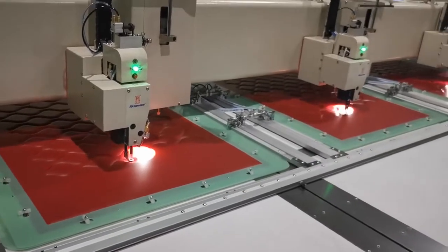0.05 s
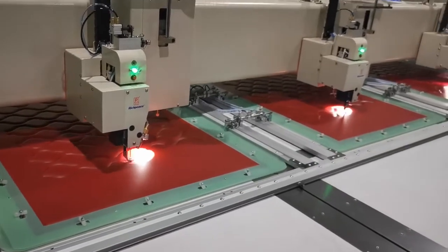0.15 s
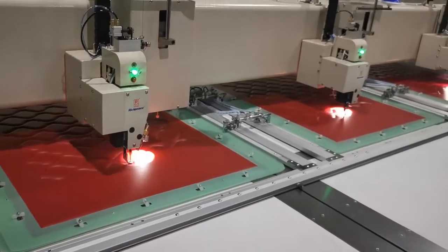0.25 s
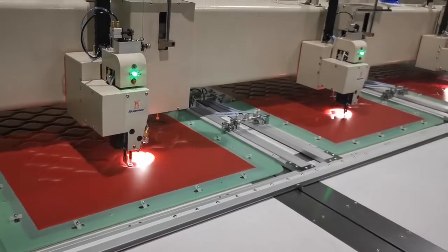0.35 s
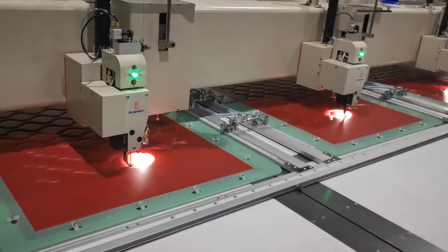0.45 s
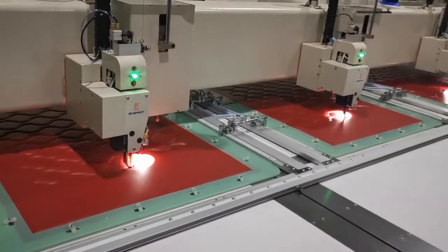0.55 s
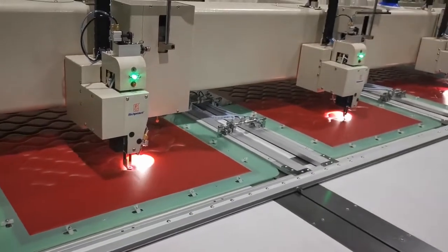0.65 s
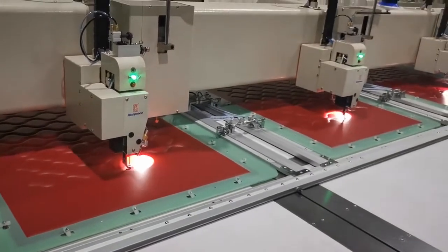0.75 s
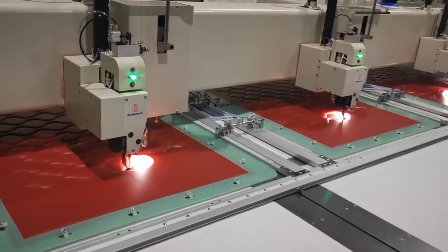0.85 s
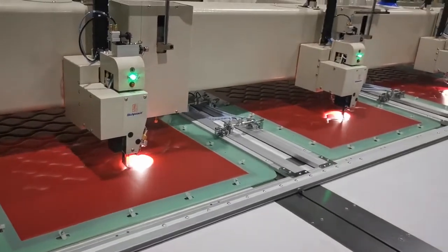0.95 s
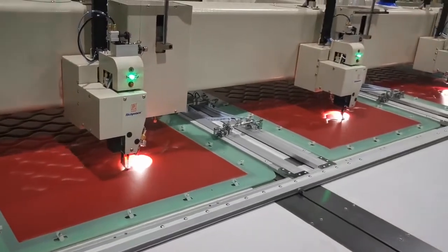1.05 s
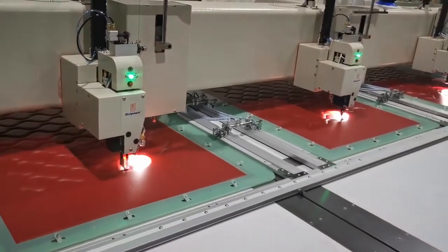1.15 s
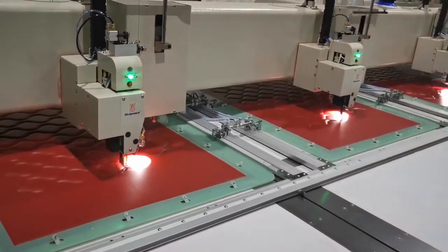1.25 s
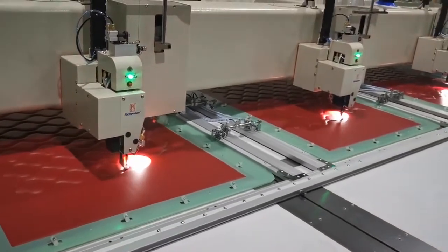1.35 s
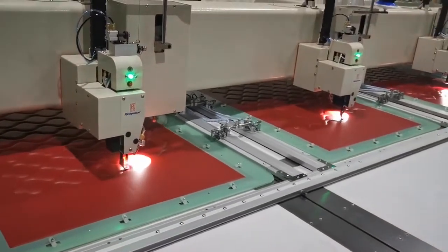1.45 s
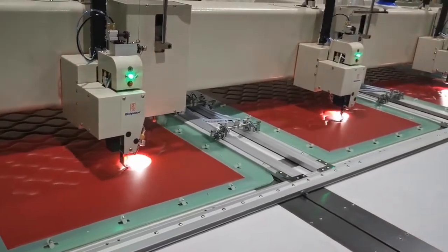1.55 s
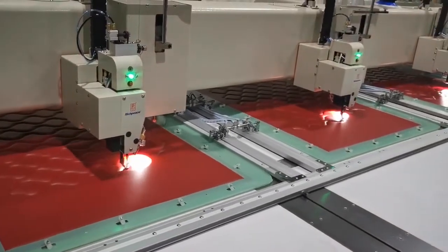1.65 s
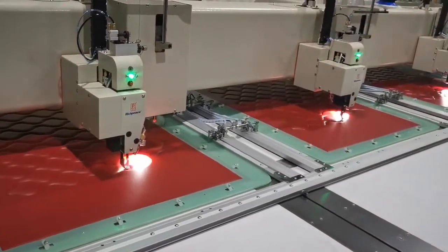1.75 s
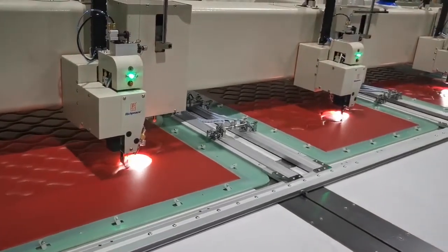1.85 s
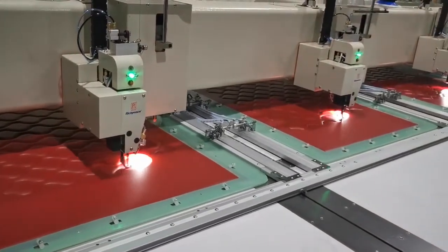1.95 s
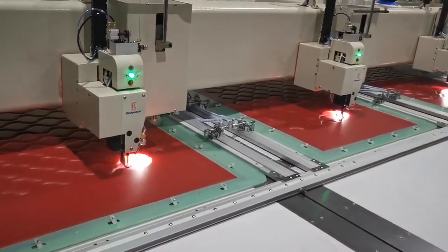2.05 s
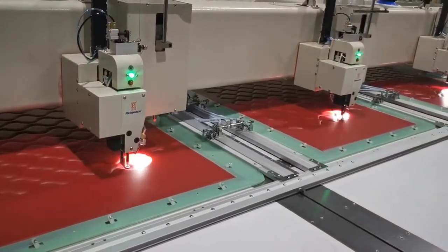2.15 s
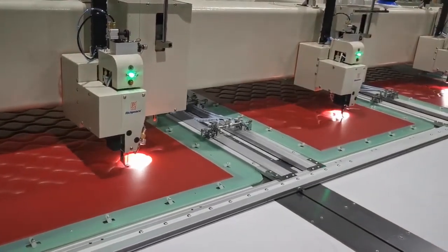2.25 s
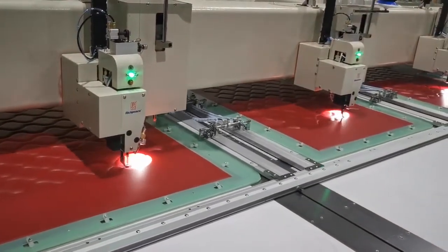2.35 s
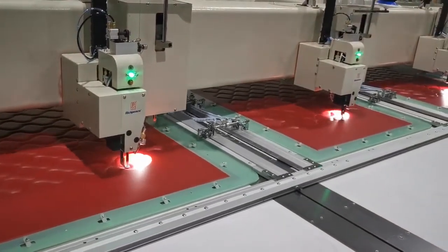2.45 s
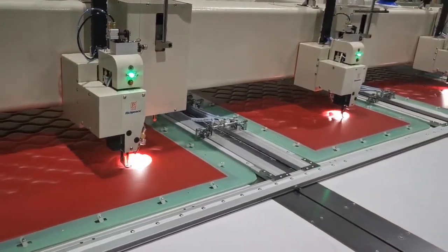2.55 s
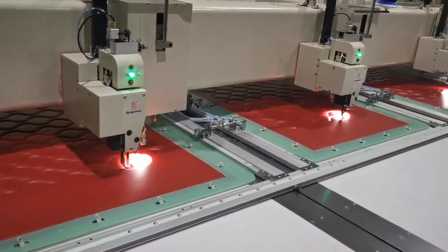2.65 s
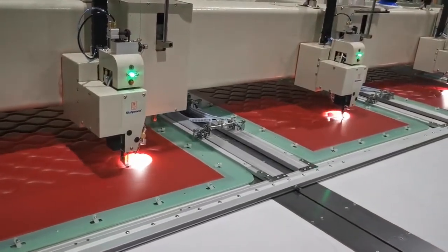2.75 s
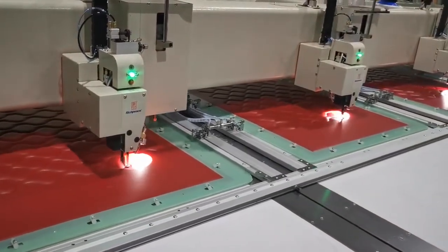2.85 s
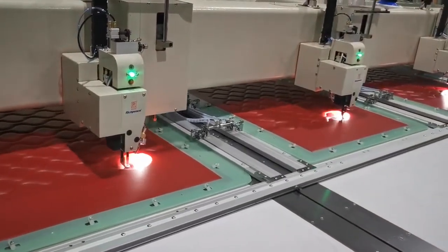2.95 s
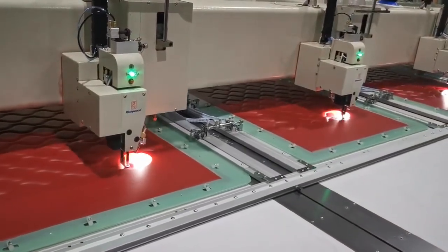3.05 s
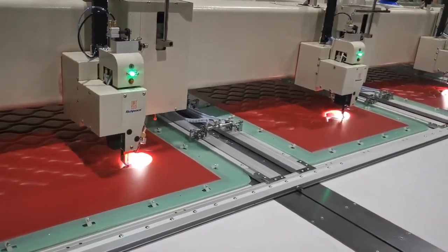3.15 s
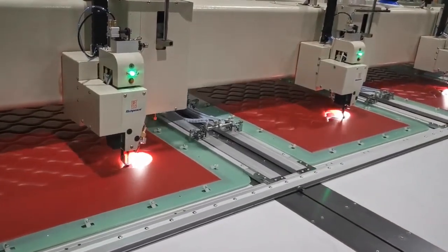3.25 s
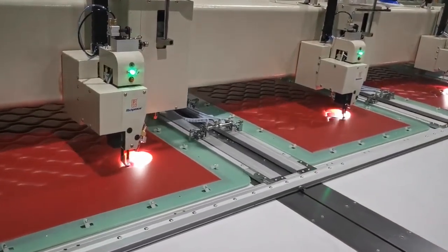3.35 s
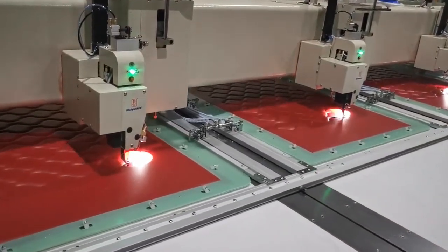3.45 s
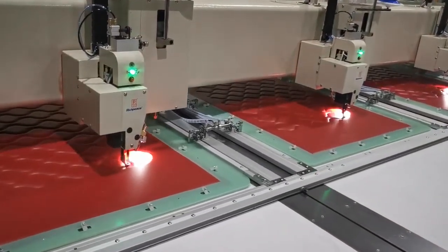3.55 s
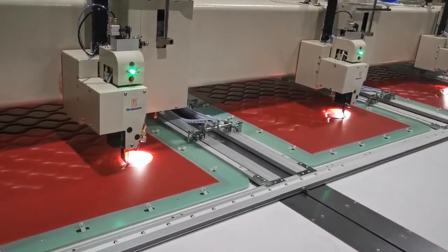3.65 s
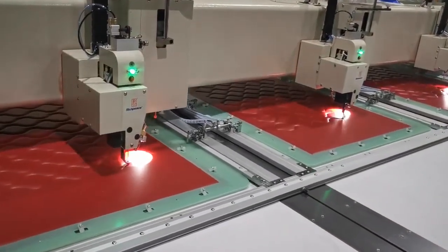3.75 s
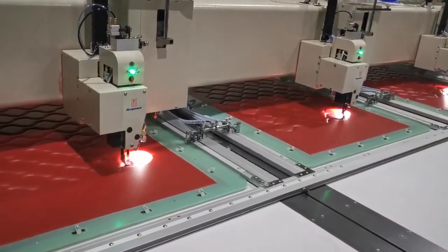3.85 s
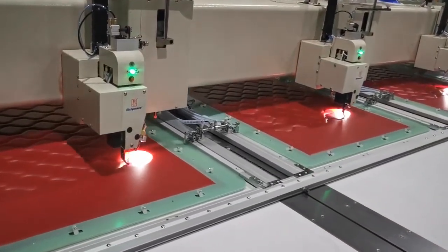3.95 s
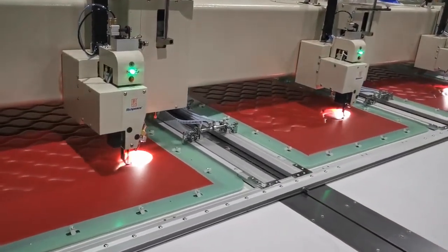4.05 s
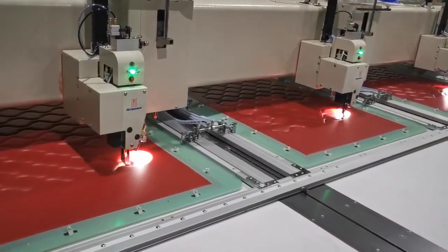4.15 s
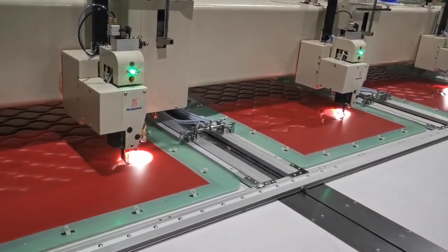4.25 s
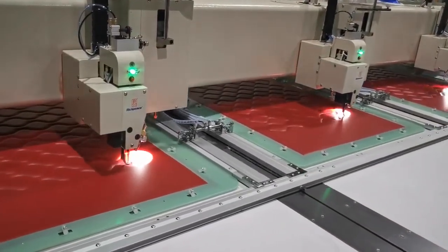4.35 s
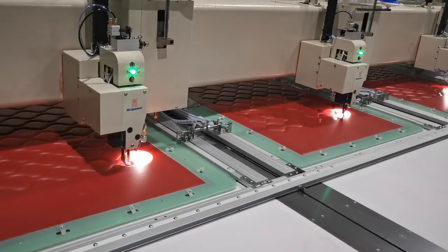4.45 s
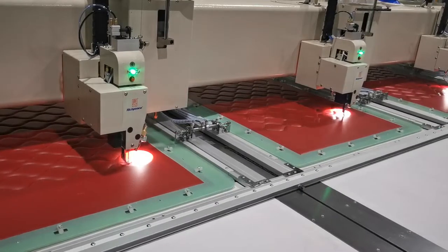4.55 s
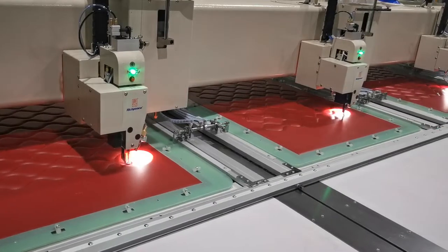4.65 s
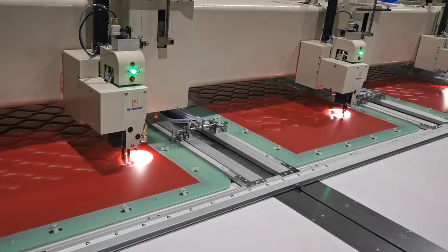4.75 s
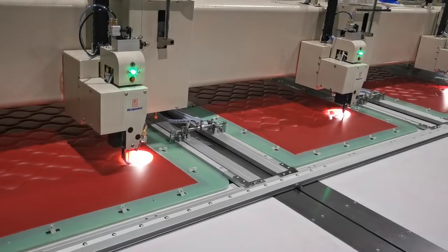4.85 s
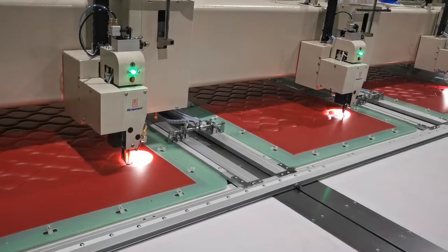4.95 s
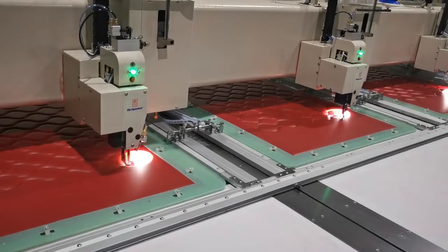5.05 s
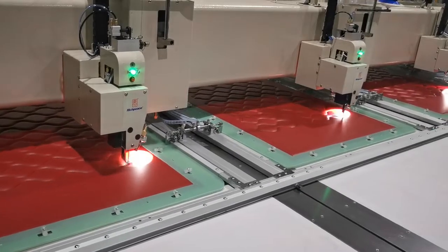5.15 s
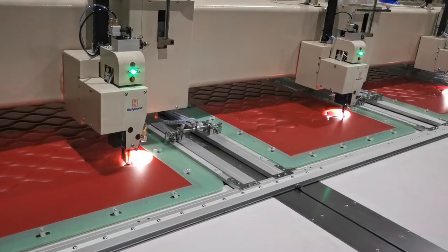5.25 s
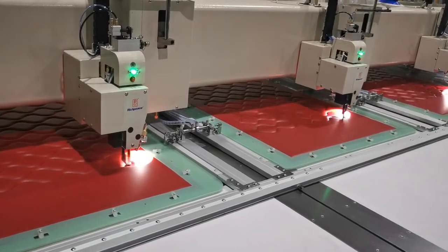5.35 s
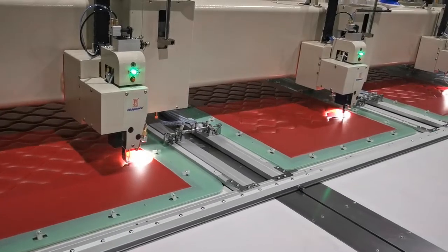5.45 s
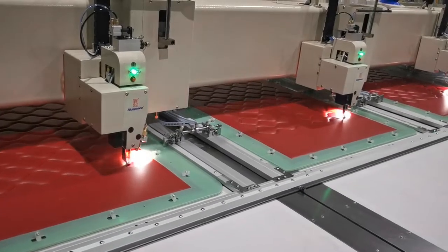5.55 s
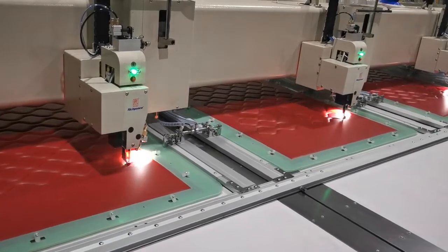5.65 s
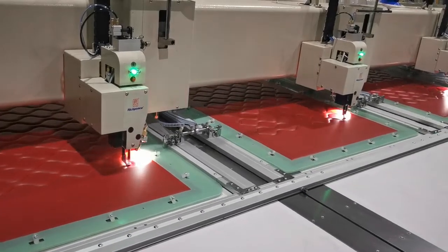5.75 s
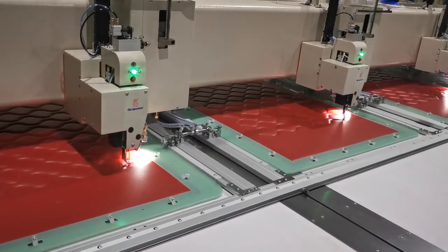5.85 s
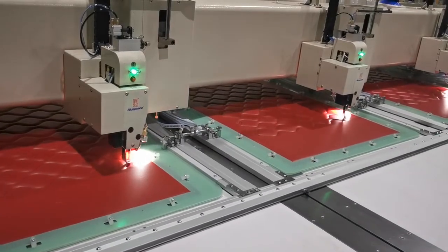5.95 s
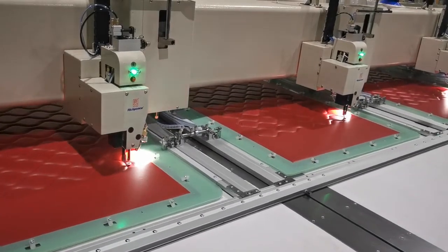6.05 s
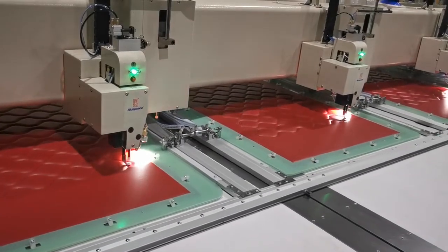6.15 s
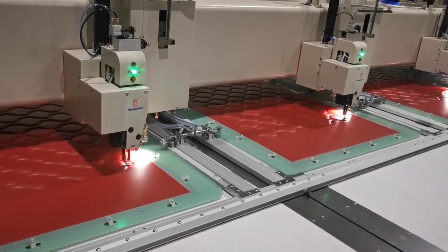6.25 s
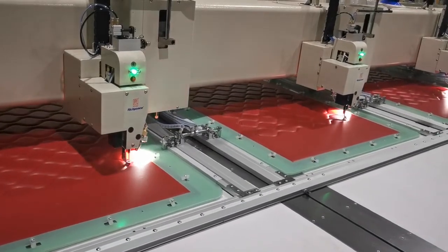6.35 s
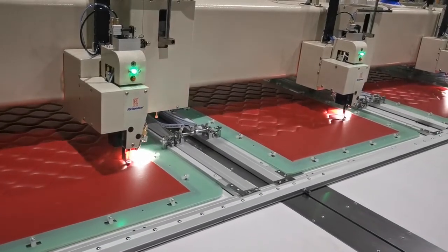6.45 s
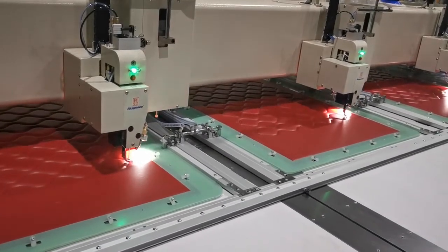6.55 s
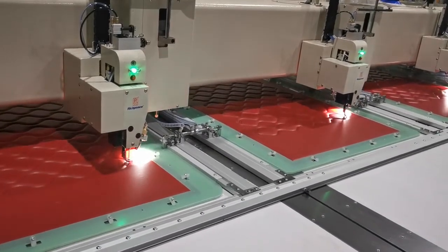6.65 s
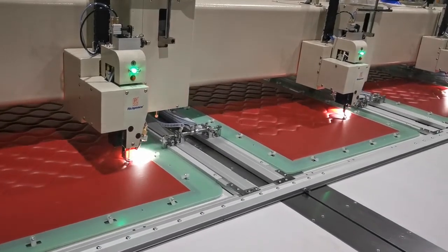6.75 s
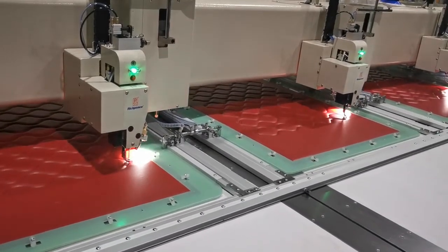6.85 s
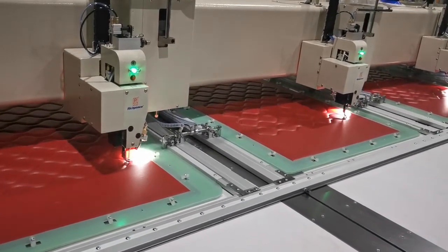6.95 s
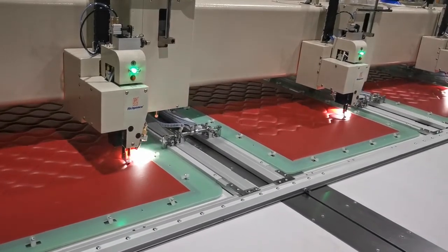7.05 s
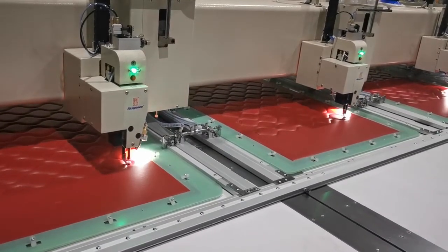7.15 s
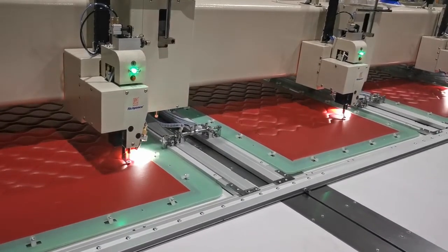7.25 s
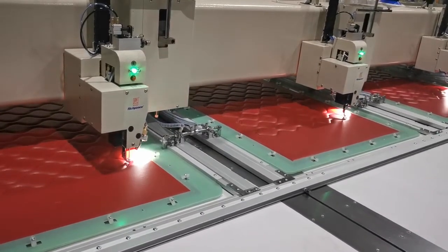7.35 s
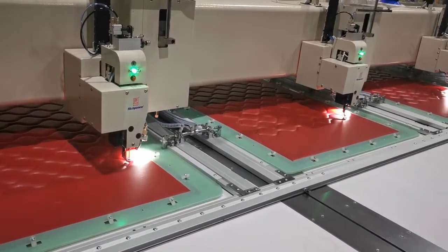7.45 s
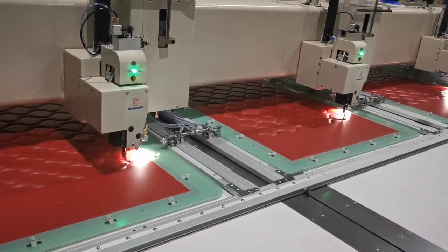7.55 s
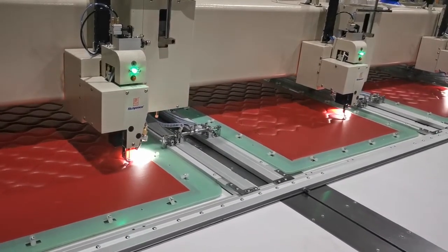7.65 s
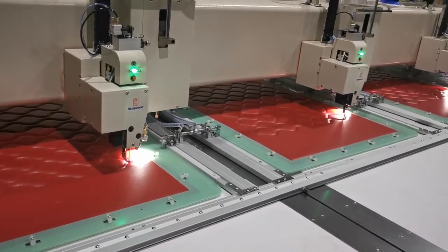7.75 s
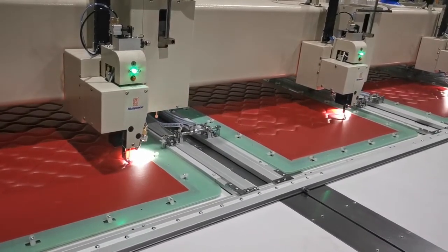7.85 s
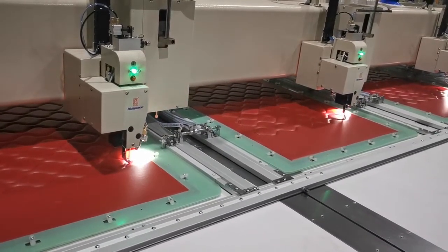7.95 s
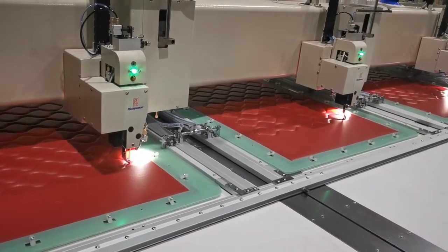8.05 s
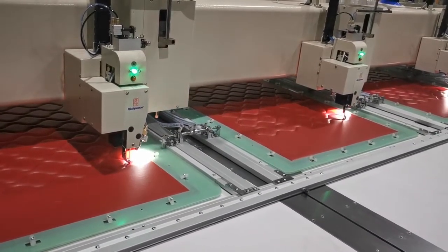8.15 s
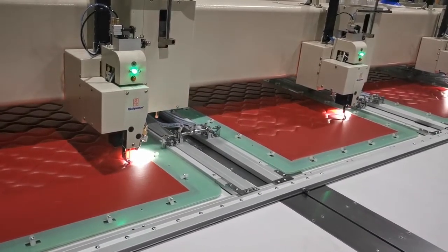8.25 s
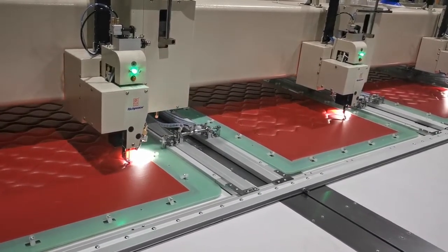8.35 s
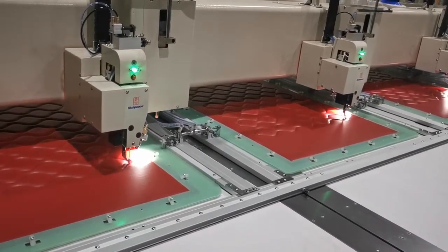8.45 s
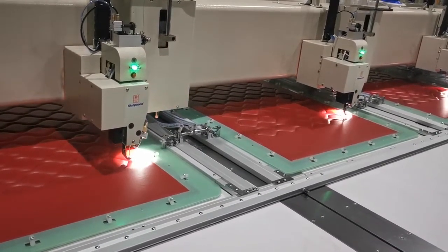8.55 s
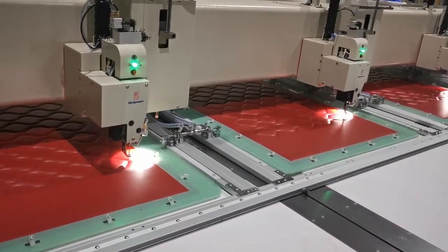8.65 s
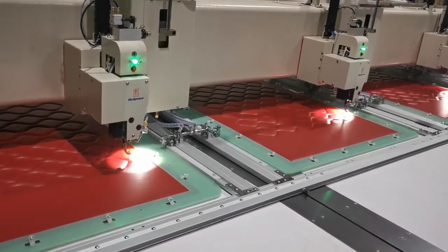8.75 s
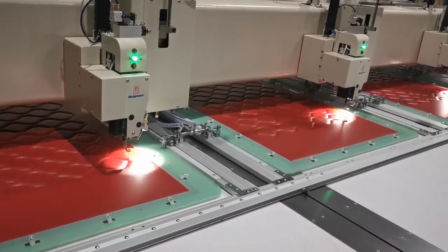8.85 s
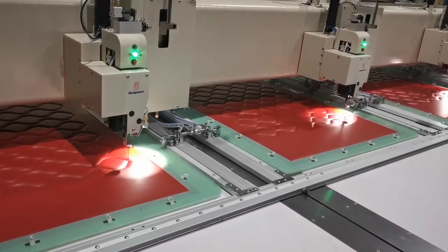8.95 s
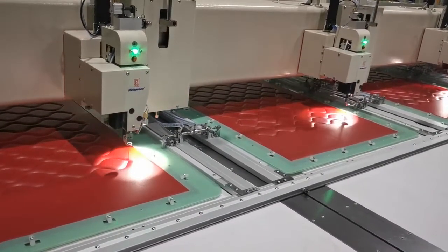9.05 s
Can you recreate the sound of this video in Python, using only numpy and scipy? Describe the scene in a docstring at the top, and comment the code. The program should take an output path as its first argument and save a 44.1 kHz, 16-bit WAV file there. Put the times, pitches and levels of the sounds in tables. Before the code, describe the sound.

A multi-head leather stitching machine rattles and whines steadily with hissing air, then brakes, snaps to rest, clacks, puffs and ends on a sagging air bleed.

```python
"""Automatic leather stitching machine

A multi-head sewing machine stitches leather at 800 stitches a minute in a factory hall.
Shaft orders sum to a toothed whine, fixed clicks per turn rattle, and filtered noise hisses as needle air.
It brakes to rest: valves puff noise, a servo hums and creeps in two pushes, and decaying modes
knock as the mechanism lifts. A sagging hiss of air bleeds away; noise tails give the hall."""
import sys
import numpy as np
from scipy import signal
from scipy.fft import rfft, irfft, next_fast_len
from scipy.io import wavfile
from scipy.ndimage import uniform_filter1d

SR = 44100
rng = np.random.default_rng(int(sys.argv[2]) if len(sys.argv) > 2 else 0)


def waveform_to_disk(signal):
    """Save audio, clipped to [-1, 1], as 16-bit WAV at the path in sys.argv[1]."""
    frames = np.transpose(np.atleast_2d(signal))
    scaled = np.clip(frames, -1, 1) * 32767
    samples = np.round(scaled).astype(np.int16)
    wavfile.write(sys.argv[1], SR, samples)


N = 401310
T, HZ = np.arange(N) / SR, np.fft.rfftfreq(N, 1 / SR)

# Stereo agreement. Each row: frequency in Hz, left-right correlation.
CORRELATION = [(100, 1), (180, 0.9), (330, 1), (600, 0.41), (1100, 0.06), (2000, 0), (4000, 0.0017)]
# Balance of a centred source. Each row: frequency in Hz, left-right level in dB.
CENTRE_SIDE = [(100, 0)]
# Balance of the machine body. Each row: frequency in Hz, left-right level in dB.
BODY_SIDE = [(300, 0.5), (600, -1.5), (1100, -0.5), (1500, -6.5), (2400, -7.5)]
# Noise floor of the hall. Each row: frequency in Hz, relative level in dB.
HALL_SPECTRUM = [(25, -22), (36, -4), (48, 11.5), (75, 0), (115, 4), (160, -2), (240, 0), (400, -8.5),
                 (800, -6), (1500, -14), (3000, -20), (6000, -41), (15000, -42)]
# Decay of the hall. Each row: frequency in Hz, t60 in seconds.
HALL_T60 = [(100, 0.84), (400, 0.71), (900, 1), (1400, 0.77), (2300, 0.64), (3000, 0.76), (8000, 0.4),
            (15000, 0.24)]

# Main shaft. Each row: time in seconds, speed in turns per second.
SHAFT_SPEED = [(0, 13.333), (6.25, 13.333), (6.3, 12.6), (6.35, 11.1), (6.45, 9.7), (6.56, 8.4),
               (6.64, 7.9), (6.74, 5.8), (6.9, 2), (7.0, 0)]
# Shaft orders, strongest at the tooth mesh. Each row: cycles per turn, relative level in dB.
SHAFT_ORDERS = [(3, -22.5), (4, -21), (5, -12.5), (7, -26.5), (8, -25.5), (9, -29), (11, -27.5),
                (12, -25.5), (13, -54), (15, -34), (16, -17.5), (17, -51), (18, -17), (19, -17), (20, -16),
                (21, -11), (22, -16), (23, -19), (24, -50), (26, 2.5), (28, -9), (29, -37), (32, -20),
                (33, -28), (34, -23), (36, -16.5), (37, -18.5), (39, -25)]
# Ringing overtones of the drive. Each row: cycles per turn before rounding, relative level in dB,
# left-right level in dB.
DRIVE_OVERTONES = [(42, -21.5, -11), (49, -20.5, 4), (53, -22, -15), (56, -19.5, -2), (61, -25.5, 1),
                   (72.9, -32, -8), (76.14, -11, -1.5), (81.2, -22, -1), (95.7, -17.5, -6),
                   (103.3, -29, -18), (149.4, -24.5, -10), (168.7, -21.5, -22)]
# Stereo phase of the shaft orders. Each row: frequency in Hz, left lead in radians.
CHANNEL_PHASE = [(280, -0.052), (347, -0.44), (375, -0.11), (500, -0.7)]
WHINE_DB, WHINE_DROP_DB = -23, 1  # at full speed; drop as the motor lets go
WHINE_FALL_DB_PER_TURN_PER_S = 3
MESH_ORDER = 26  # teeth that mesh in one turn
AFTERSOUND_S, AFTERSOUND_DB, AFTERSOUND_DB_PER_S = 6.27, -31.5, 38.5

# Linkage rattle. Each row: frequency in Hz, relative level in dB.
LINKAGE_SPECTRUM = [(240, -11), (400, -1), (520, -5), (600, -22), (760, -2), (930, -1), (1050, -1),
                    (1170, -3), (1320, -6.5), (1490, -11.5), (2140, -14), (2300, -11.5), (3200, -22),
                    (5000, -52)]
# Loose churn. Each row: frequency in Hz, relative level in dB.
CHURN_SPECTRUM = [(25, -30), (45, -6), (70, 5), (95, -16), (150, -6.5), (210, 1.5), (340, 3.5), (450, -1),
                  (700, -3), (1100, -0.5), (1300, -7.5), (1500, -13), (2400, -8), (3500, -21.5),
                  (6000, -42)]
# Rattle at full speed, its fall at half speed, and how late that fall comes (exponent).
RATTLE_DB, RATTLE_FALL_DB, RATTLE_BEND = -28.5, 12, 1.38

# Blows within a stitch. Each row: share of a turn, mean level in dB, mean pitch in Hz, width in Hz,
# left-right level in dB, scrape level in dB.
STITCH_BLOWS = [(0.994, -36, 2150, 500, -14, -34.5), (.069, -23.5, 1040, 220, -5, -43),
                (.135, -25, 1010, 220, 0, -49), (.345, -20.5, 1090, 240, -8, -31),
                (.395, -23.5, 890, 200, -4, -40), (.475, -21, 1240, 260, -5, -48),
                (.52, -25, 694, 260, -3, -48), (.598, -26, 610, 130, -3, -55),
                (.672, -28, 1040, 260, -4, -60), (.745, -28, 880, 280, -2, -51),
                (0.774, -30, 1210, 260, -15, -39), (.838, -19.5, 790, 146, -6, -54),
                (.885, -24.5, 980, 200, -14, -42), (.925, -26, 774, 179, -9, -48)]
# Needle scrape. Each row: frequency in Hz, relative level in dB.
SCRAPE_SPECTRUM = [(900, -12), (1500, 3.5), (2200, -3.5), (3000, -11.5), (5000, -8.5), (9000, -17),
                   (15000, -40)]

# Needle air. Each row: frequency in Hz, relative level in dB.
HISS_SPECTRUM = [(800, -13), (2000, -13.5), (2800, -1), (3500, -1), (5500, 2), (7500, -2), (8700, -5.5),
                 (10200, -4), (10550, -3), (11700, -3), (13000, -8), (15500, -24)]
# Its balance. Each row: frequency in Hz, left-right level in dB.
HISS_SIDE = [(2000, -11), (3000, -4.5), (5000, -1), (7500, -10), (9000, 2.5), (11500, 6), (15000, 0)]
# Nozzle whistle. Each row: frequency in Hz, relative level in dB.
WHISTLE_SPECTRUM = [(5000, -41), (5800, -16), (6200, -0.5), (6500, 1), (6950, 0.5), (7300, -5),
                    (7800, -12.5), (8800, -33)]
# Its balance. Each row: frequency in Hz, left-right level in dB.
WHISTLE_SIDE = [(6000, -10), (6600, -11), (7100, -16), (8000, -25)]
# The whistle locks onto its narrow note. Each row: centre in seconds, half length in seconds,
# added share 0-1, swell in dB.
WHISTLE_FLARES = [(4.48, 0.19, 0.4, 1.5), (5.844, 0.21, 0.53, 3)]
HISS_DB, WHISTLE_DB, AIR_OFF_S = -36.5, -31.5, 6.847  # valve open; moment it shuts
# The shut line empties quickly down to a small leak that dies slowly.
EMPTY_DB_PER_S, LEAK_DB, LEAK_DB_PER_S = 30, -25, 5

# Exhaust puffs. Each row: start in seconds, level in dB before a common trim, valve open in seconds,
# low edge in Hz.
EXHAUST_PUFFS = [(6.214, -31, 0.012, 1950), (6.903, -30, 0.0061, 1800), (6.917, -33.5, 0.0093, 1500),
                 (7.620, -58, .005, 5000), (7.808, -42, 0.012, 4500), (8.269, -39, 0.067, 3000),
                 (8.304, -30.5, 0.015, 3160)]
# Air through a valve. Each row: frequency in Hz, relative level in dB.
VALVE_SPECTRUM = [(800, -33), (1700, 5.5), (2300, 1.5), (2750, 3), (3400, 0.5), (5200, 2.5), (7000, 0.5),
                  (8700, -4), (11500, -0.5), (13000, -5), (15500, -11)]
# Air through the silencer. Each row: frequency in Hz, relative level in dB.
VENT_SPECTRUM = [(760, -48), (1300, -16), (1400, -14), (1600, -12.5), (1740, -10.5), (2160, -3), (2830, -4),
                 (3070, 0), (3410, -5.5), (4370, -3), (6220, -9.5), (6900, -7.5), (10900, -9), (15500, -21)]
# Balance of valve and silencer air. Each row: frequency in Hz, left-right level in dB.
VENT_SIDE = [(1300, 0), (2400, -6), (3100, -2.5), (4400, 1), (7500, -7), (9500, 9), (11500, 8.5),
             (15000, 0)]
# Cylinder strokes. Each row: start in seconds, air level in dB before a common trim,
# valve open in seconds, high edge in Hz, tube ring in dB, table boom in dB.
CYLINDER_STROKES = [(7.069, -36, 0.035, 11000, -40.5, -32.5), (7.686, -41.5, 0.078, 11030, -41.5, -44),
                    (8.112, -39, 0.043, 6800, -43, -38.5)]
STROKE_RISE_S = .009  # a cylinder's valve snaps open
BLEED_S, BLEED_DB, BLEED_SAG_DB_PER_S = 8.453, -32.5, 2.5

# Knocks. Each row: start in seconds, chatter in dB, low edge in Hz, high edge in Hz,
# tilt in dB per octave, chatter hold in seconds, frame ring in dB, table boom in dB.
STOP_KNOCKS = [(5.351, -28, 900, 2390, -6, .001, -34, -65), (6.21, -29.5, 300, 2200, 6, 0.013, -39, -38),
               (6.235, -35, 400, 2400, -3, .004, -40, -41), (6.285, -36, 420, 1400, -7, .004, -29, -28),
               (6.431, -37, 160, 260, -3, .008, -34, -48), (6.469, -30, 240, 1400, -4, .003, -31, -50),
               (6.565, -33, 190, 420, -3, .01, -38, -43), (6.645, -41, 257, 330, -3, 0.017, -32, -54),
               (6.899, -35, 110, 230, -1.5, 0.0035, -34, -39), (6.918, -38, 550, 1150, -3, 0.036, -50, -55),
               (7.11, -40.5, 340, 1000, -2, 0.084, -56, -38),
               (7.793, -24, 387, 1040, -3, 0.019, -26.5, -41),
               (7.799, -28, 140, 180, -11, 0.02, -20.5, -49), (8.256, -26, 300, 2200, 0, 0.008, -37, -58),
               (8.264, -18, 255, 2250, .5, 0.019, -16, -46), (8.296, -24, 240, 330, 2.5, .004, -30, -34),
               (8.408, -30, 263, 440, 3, 0.0088, -32, -35), (8.453, -24, 250, 402, -6, 0.0035, -25, -31)]
# Modes of the steel frame. Each row: frequency in Hz, relative level in dB, t60 in seconds.
FRAME_MODES = [(185.6, 5.5, 0.17), (238, 0.5, .16), (267, 8.5, 0.15), (376, -2.5, 0.17), (450, -4, 0.14),
               (500, -11, .15), (564, -19, 0.19), (700, -7, 0.22), (813, -3, 0.26), (930, -3.5, 0.13),
               (1095, -3, 0.16), (1262, 1, 0.082), (1368, -1, 0.15), (1680, -4, .17), (1840, -2, 0.2),
               (2110, -3.5, 0.18), (2236, 3, 0.16)]
# Modes of the table. Each row: mean frequency in Hz, relative level in dB, t60 in seconds.
TABLE_MODES = [(60, -5, .45), (74.4, 1, 0.33), (116.3, -1.5, 0.49)]
KNOCK_FALL_S = 0.022
BOOM_LAG_S, BOOM_RISE_S = 0.0191, 0.0041
# Hits of the latch. Each row: start in seconds, level in dB, tilt in dB per octave.
LATCH_HITS = [(6.904, -1.5, 2.5), (6.918, -9, -7.5)]
# Modes of the steel latch. Each row: frequency in Hz, level in dB before hit and tilt, t60 in seconds.
LATCH_MODES = [(680, -38, .09), (908, -33.5, 0.13), (1980, -35, 0.07), (2970, -21, 0.02), (4440, -32, .035),
               (5730, -43, .04), (7100, -30, .04), (7400, -23.5, 0.05)]
# Table shudder. Each row: frequency in Hz, relative level in dB.
SHUDDER_SPECTRUM = [(40, -24), (56, -16), (68, 1.5), (88, -25), (115, -1), (145, -13), (200, -8), (232, -8),
                    (270, -20), (400, -13), (520, -11), (2000, -62)]
SHUDDER_S, SHUDDER_RISE_S, SHUDDER_DB = 6.07, 0.21, -31.5

# Tones of the creeping servo. Each row: mean frequency in Hz, relative level in dB.
SERVO_TONES = [(47, -6), (333, -5), (378, -7), (420, -4.5), (480, -7.5), (510, -11.5)]
CREEP_S, CREEP_RISE_S, CREEP_HOLD_S, CREEP_FALL_S, CREEP_DB = 7.05, 0.19, 0.68, 0.04, -46
# Pushes of the servo. Each row: start in seconds, length in seconds, hum level in dB,
# whirr start in Hz, whirr end in Hz.
SERVO_PUSHES = [(7.305, 0.272, -43.5, 262, 303), (7.619, 0.2, -49.5, 302, 376)]
PUSH_HUM_HZ, PUSH_WHIRR_DB = 225, -3  # whirr relative to the hum

EDGE_HZ = 15700


def amp(db):
    """Decibels to gain."""
    return 10 ** (np.asarray(db) / 20)


def unit(x):
    """Scales to rms 1."""
    return x / np.sqrt(np.mean(x ** 2) + 1e-20)


def curve(rows, axis=1):
    """One column of a control table at every sample."""
    rows = np.array(rows)
    return np.interp(T, rows[:, 0], rows[:, axis])


def read(points, hz=HZ):
    """A spectrum joined by lines on a log-frequency axis."""
    f, value = np.transpose(points)
    return np.interp(np.log(hz + 1), np.log(f + 1), value)


def pan(db):
    """Left and right gains of constant power."""
    gains = np.array([amp(np.atleast_1d(db) / 2), amp(-np.atleast_1d(db) / 2)])
    return gains / np.sqrt(np.mean(gains ** 2, 0))


def drift(hz):
    """Slow chance of rms 1, fading out around the given rate."""
    return unit(irfft(rfft(rng.standard_normal(N)) * np.exp(-(HZ / hz) ** 2), N))


def envelope(t, rise_s, hold_s, fall_s):
    """Straight attack from t = 0, hold, exponential release."""
    return np.clip(t / rise_s, 0, 1) * np.exp(-np.maximum(t - rise_s - hold_s, 0) / fall_s)


def add(mix, s, sound):
    """Places a stereo sound at time s."""
    part = mix[:, round(s * SR):][:, :sound.shape[1]]
    part += sound[:, :part.shape[1]]


def colour(pair, gain, side=CENTRE_SIDE):
    """Filters two unrelated signals into a stereo pair that agrees in the bass."""
    hz = np.fft.rfftfreq(pair.shape[1], 1 / SR)
    a, b = rfft(pair)
    same = np.clip(read(CORRELATION, hz), -1, 1)
    both = np.array([a, same * a + np.sqrt(1 - same ** 2) * b])
    return unit(irfft(both * gain * pan(read(side, hz)), pair.shape[1]))


def panel_ripple(hz, reflect=.22, count=6):
    """Echoes off nearby steel panels ripple a spectrum, differently in each channel."""
    delays_s = rng.uniform(0.00101, .012, (count, 2, 1))
    return abs(1 + reflect * np.exp(-2j * np.pi * hz * delays_s).sum(0))


def noise(spectrum, side=CENTRE_SIDE, reflect=0):
    """Steady stereo noise with the given spectrum and strength of panel echoes."""
    size = next_fast_len(N, True)
    hz = np.fft.rfftfreq(size, 1 / SR)
    gain = amp(read(spectrum, hz)) * (panel_ripple(hz, reflect) if reflect else 1)
    return colour(rng.standard_normal((2, size)), gain, side)[:, :N]


def band(hz, low_hz, high_hz, order):
    """Gain of a band-pass."""
    return 1 / np.sqrt((1 + (low_hz / (hz + 1)) ** (2 * order)) * (1 + (hz / high_hz) ** (2 * order)))


def causal(gain):
    """Gives a filter the phase that makes it ring only after it is struck."""
    log = np.log(np.maximum(gain / gain.max(), 1e-5))
    return np.exp(np.conj(signal.hilbert(np.r_[log, log[-2:0:-1]])))[:len(gain)]


def struck(modes, spread_hz=1300):
    """Free ring of modes; the higher a mode, the more its phase differs between channels."""
    t, ring = T[:SR // 2], 0
    for hz, db, t60_s in modes:
        sign = rng.choice([-1, 1])
        phase = min(hz / spread_hz, 1) * rng.standard_normal((2, 1))
        ring = ring + amp(db - 60 * t / t60_s) * sign * np.sin(2 * np.pi * hz * t + phase)
    return ring


def strikes(turns, share):
    """One click each time the shaft passes the given share of a turn."""
    return np.diff(np.floor(turns - share), prepend=np.floor(-share))


def shaft_angle(ripple_turns=.0018, wander_turns=0.00034):
    """Turns made so far; the shaft slows and recovers a little within every stitch."""
    turns = np.cumsum(curve(SHAFT_SPEED)) / SR
    return turns + ripple_turns * np.sin(2 * np.pi * turns) + wander_turns * drift(5.5)


def slowing():
    """Turns per second that the shaft has lost from full speed."""
    speed = curve(SHAFT_SPEED)
    return speed.max() - speed


def vigour():
    """Gain of all that rattles: it holds up as braking begins, then collapses."""
    lost = slowing()
    return amp(-RATTLE_FALL_DB * (2 * lost / lost.max()) ** RATTLE_BEND)


def hall_floor():
    """Steady coloured noise of the hall, its level wavering slightly."""
    return amp(-48.5 + 0.31 * drift(12.0)) * noise(HALL_SPECTRUM)


def hall(x):
    """Diffuse tail of the hall, each band dying at its own speed."""
    hz, t, z = signal.stft(rng.standard_normal((2, SR)), SR, nperseg=256)
    decay = amp(-60 * t / read(HALL_T60, hz)[:, None])
    build = 1 - np.exp(-t / 0.012)
    tail = signal.istft(z * decay * build, SR, nperseg=256)[1]
    tail = colour(tail[:, :SR], 1) / np.sqrt(SR)
    return signal.fftconvolve(x, tail, axes=1)[:, :N]


def aftersound(rise_s=0.054, waver_db=-3.5):
    """The hall holds the full-speed note of the teeth while the drive falls away beneath it."""
    t = np.maximum(T - AFTERSOUND_S, 0)
    note = unit(np.sin(2 * np.pi * MESH_ORDER * SHAFT_SPEED[0][1] * T))
    level_db = AFTERSOUND_DB - AFTERSOUND_DB_PER_S * t + waver_db * drift(8)
    return np.minimum(t / rise_s, 1) * amp(level_db) * note


def shudder():
    """The table rumbles as the seam ends and the shaft brakes, and settles with the shaft."""
    rise = np.clip((T - SHUDDER_S) / SHUDDER_RISE_S, 0, 1)
    return amp(SHUDDER_DB) * rise * vigour() * noise(SHUDDER_SPECTRUM)


def servo(waver=0.032, rub_db=-2.5):
    """A servo creeps to its rest position, humming on wavering tones and rubbing."""
    hum = 0
    for hz, db in SERVO_TONES:
        cycles = np.cumsum(hz * (1 + waver * drift(33.2))) / SR
        hum = hum + amp(db) * np.sin(2 * np.pi * cycles)
    move = envelope(T - CREEP_S, CREEP_RISE_S, CREEP_HOLD_S, CREEP_FALL_S)
    return amp(CREEP_DB) * move * (unit(hum) + amp(rub_db) * noise(CHURN_SPECTRUM, BODY_SIDE))


def nudges(edge_s=0.06, waver=0.0245, flutter_db=3.5):
    """The servo pushes twice: the frame hums at one pitch while a soft whirr climbs above it."""
    out = np.zeros(N)
    for s, length_s, db, from_hz, to_hz in SERVO_PUSHES:
        push = np.clip(np.minimum(T - s, s + length_s - T) / edge_s, 0, 1)
        hz = np.interp(T, [s, s + length_s], [from_hz, to_hz]) * (1 + waver * drift(31))
        whirr = amp(PUSH_WHIRR_DB + flutter_db * drift(22)) * np.sin(2 * np.pi * np.cumsum(hz) / SR)
        out += amp(db) * np.sqrt(2) * push * (np.sin(2 * np.pi * PUSH_HUM_HZ * T) + whirr)
    return out


def bleed(rise_s=0.0041, spurt_db=3.5, spurt_fall_s=0.026):
    """Air bleeds through the silencer: a first spurt, then a slowly sagging hiss."""
    t = np.maximum(T - BLEED_S, 0)
    level_db = BLEED_DB + spurt_db * np.exp(-t / spurt_fall_s) - BLEED_SAG_DB_PER_S * t
    return np.minimum(t / rise_s, 1) * amp(level_db) * noise(VENT_SPECTRUM, VENT_SIDE, reflect=0.19)


def valve_air(low_hz, high_hz):
    """One second of air rushing through a valve."""
    hz = np.fft.rfftfreq(SR, 1 / SR)
    gain = band(hz, low_hz, high_hz, order=2) * amp(read(VALVE_SPECTRUM, hz))
    gain = gain * panel_ripple(hz, reflect=0.62)
    return colour(rng.standard_normal((2, SR)), gain, VENT_SIDE)


def valves(trim_db=3.0, rise_s=0.0041, fall_per_open=2.4, high_hz=13500, side_db=0.0):
    """Short puffs of exhaust air; the longer a valve is open, the slower its puff dies."""
    out = np.zeros((2, N))
    for s, db, open_s, low_hz in EXHAUST_PUFFS:
        shape = envelope(T[:SR], rise_s, open_s, fall_per_open * open_s)
        add(out, s, amp(db + trim_db) * pan(side_db) * shape * valve_air(low_hz, high_hz))
    return out


def boom(detune=0.051):
    """The table's low answer to a jolt, its modes detuned a little each time."""
    modes = [(hz * (1 + detune * rng.standard_normal()), db, t60_s) for hz, db, t60_s in TABLE_MODES]
    return np.minimum(T[:SR // 2] / BOOM_RISE_S, 1) * struck(modes)


def cylinders(trim_db=0.5, fall_s=0.11, low_hz=2400, side_db=-1, ring_hz=2760, width_hz=850,
              fill_s=0.04, linger_s=0.11, tube_side_db=-7):
    """Each stroke jolts the table while air rushes in and rings on in the hollow tube."""
    out, t, hz = np.zeros((2, N)), T[:SR], np.fft.rfftfreq(SR, 1 / SR)
    resonance = 1 / (1 + (2 * (hz - ring_hz) / width_hz) ** 2)
    for s, db, open_s, high_hz, tube_db, boom_db in CYLINDER_STROKES:
        rush = pan(side_db) * envelope(t, STROKE_RISE_S, open_s, fall_s) * valve_air(low_hz, high_hz)
        ring = colour(rng.standard_normal((2, SR)), resonance)
        tube = pan(tube_side_db) * envelope(t, fill_s, open_s, linger_s) * ring
        add(out, s, amp(db + trim_db) * rush + amp(tube_db) * tube)
        add(out, s, amp(boom_db) * boom())
    return out


def latch(side_db=-2, pivot_hz=2000):
    """A steel latch snaps brightly as the shaft comes to rest, then seats with a duller clack."""
    out = np.zeros((2, N))
    for s, hit_db, tilt_db in LATCH_HITS:
        modes = [(hz, db + tilt_db * np.log2(hz / pivot_hz), t60_s) for hz, db, t60_s in LATCH_MODES]
        add(out, s, amp(hit_db) * pan(side_db) * struck(modes))
    return out


def frame_chatter(shape, low_hz, high_hz, tilt_db, dense_db=-9, width_hz=45, bounce_s=.0052,
                  contact_share=0.4):
    """A part bounces unevenly on its stop under the envelope, shaking the steel frame within a band."""
    hz = np.fft.rfftfreq(len(shape), 1 / SR)
    body = amp(dense_db) + sum(amp(db) / (1 + (2 * (hz - f) / width_hz) ** 2) for f, db, _ in FRAME_MODES)
    gain = body * band(hz, low_hz, high_hz, order=4) * amp(tilt_db * np.log2(hz + 1))
    pace = np.exp(.25 * unit(uniform_filter1d(rng.standard_normal(len(shape)), size=200)))
    bounces = np.exp(-(np.cumsum(pace) / (bounce_s * SR) % 1) / contact_share)
    force = shape * bounces * rng.standard_normal((2, len(shape)))
    return colour(force, causal(gain), BODY_SIDE) * np.sqrt(np.mean(shape ** 2))


def knocks(rise_s=0.00024, ring_rise_s=0.0024):
    """Brake, trimmer and lifting cylinders hit stops and chatter; frame modes ring, the table booms."""
    out, t = np.zeros((2, N)), T[:SR // 2]
    hz, mode_db, t60_s = np.transpose(FRAME_MODES)
    for s, db, low_hz, high_hz, tilt_db, chatter_s, ring_db, boom_db in STOP_KNOCKS:
        shape = envelope(t, rise_s, chatter_s, KNOCK_FALL_S)
        add(out, s, amp(db) * frame_chatter(shape, low_hz, high_hz, tilt_db))
        gains = amp(mode_db + tilt_db * np.log2(hz)) * band(hz, low_hz, high_hz, order=4)
        ring = struck(zip(hz, 20 * np.log10(gains / np.linalg.norm(gains)), t60_s))
        add(out, s, amp(ring_db) * np.sqrt(2) * pan(-0.81) * np.minimum(t / ring_rise_s, 1) * ring)
        add(out, s + BOOM_LAG_S, amp(boom_db) * boom())
    return out


def air_jets(whistle_hz=6670, width_hz=200, flutter_db=0.51, narrow_share=0.29, narrow_wander=.09,
             unlock_s=6.0, unlock_fall_s=0.053):
    """Cooling air hisses from the nozzles until its valve shuts; one whistles, at times on a narrow note."""
    shut_s = np.maximum(T - AIR_OFF_S, 0)
    flow = np.maximum(amp(-EMPTY_DB_PER_S * shut_s), amp(LEAK_DB - LEAK_DB_PER_S * shut_s))
    narrow, swell_db = narrow_share + narrow_wander * drift(0.72), 0
    for s, half_s, share, db in WHISTLE_FLARES:
        flare = np.exp(-((T - s) / half_s) ** 2)
        narrow, swell_db = narrow + share * flare, swell_db + db * flare
    narrow = np.clip(narrow, 0, 1) * np.exp(-np.maximum(T - unlock_s, 0) / unlock_fall_s)
    resonance = 1 / (1 + ((HZ - whistle_hz) / width_hz) ** 2)
    note = colour(rng.standard_normal((2, N)), resonance, WHISTLE_SIDE)
    broad = noise(WHISTLE_SPECTRUM, WHISTLE_SIDE, reflect=0.21)
    whistle = np.sqrt(1 - narrow) * broad + np.sqrt(narrow) * note
    hiss = noise(HISS_SPECTRUM, HISS_SIDE, reflect=0.14)
    return flow * amp(flutter_db * drift(40)) * (amp(HISS_DB) * hiss + amp(WHISTLE_DB + swell_db) * whistle)


def linkages(turns, count=70, rattle_db=-7.0, churn_db=-2.0, uneven_db=1.8):
    """Joints click at the same shaft angles on every turn, over a loose churn that never repeats."""
    clicks = np.zeros((2, N))
    stitch = np.arange(int(turns[-1]) + 1)[:, None]
    for channel in clicks:
        angles = (np.arange(count) + rng.random(count)) / count
        at = np.minimum(np.searchsorted(turns, stitch + angles), N - 1)
        level_db = 1.9 * rng.standard_normal(count) + uneven_db * rng.standard_normal(at.shape)
        channel[at] = rng.choice([-1, 1], count) * amp(level_db)
    clicks[:, -1] = 0  # angles never reached
    rattle = colour(clicks, amp(read(LINKAGE_SPECTRUM)), BODY_SIDE)
    churn = noise(CHURN_SPECTRUM, BODY_SIDE) * amp(1.44 * drift(39))
    return amp(RATTLE_DB) * vigour() * (amp(rattle_db) * rattle + amp(churn_db) * churn)


def drive(turns, load_share=.24, scatter_rad=0.96, load_db=0.8, judder_db=5.5, unload_db=3.0, ring_db=-14):
    """Shaft orders crowd where the needle loads the drive; the teeth sing above, and stand clear in braking."""
    angle, speed = 2 * np.pi * (turns - load_share), curve(SHAFT_SPEED)
    # under braking the load eases, the belt judders and the hall rings on
    braking = np.clip(speed[0] - speed, 0, 1)
    circle = np.linspace(0, 2 * np.pi, 8192)
    lead = np.array([[.5], [-.5]])

    def play(turn):
        return np.array([np.interp(angle % (2 * np.pi), circle, channel) for channel in turn])

    orders = {}
    for k, db in SHAFT_ORDERS:
        phase = scatter_rad * rng.standard_normal() + lead * read(CHANNEL_PHASE, k * speed[0])
        orders[k] = amp(db) * np.cos(k * circle + phase)
    overtones = 0
    for k, db, side_db in DRIVE_OVERTONES:
        phase = rng.uniform(0, 2 * np.pi) + rng.normal(0, 0.14, (2, 1))
        overtones = overtones + amp(db) * pan(side_db) * np.cos(round(k) * circle + phase)
    low, teeth, high = play(sum(orders.values())), play(orders[MESH_ORDER]), play(overtones)
    low = teeth + amp(-unload_db * braking) * (low - teeth)
    level_db = WHINE_DB - WHINE_DROP_DB * braking - WHINE_FALL_DB_PER_TURN_PER_S * slowing()
    level_db = level_db + load_db * np.cos(angle) + judder_db * braking * drift(35)
    tone = (low * pan(-0.53) + amp(-1.0 + 2.0 * drift(6.8)) * high) / np.std(low[:, T < 6])
    sound = tone * np.clip(speed / 5, 0, 1) * amp(level_db)
    return sound + amp(ring_db) * hall(braking * sound)


def needle(turns, uneven_db=0.9, late_s=.00025, detune=0.051, scrape_rise_s=0.0012,
           scrape_hold_s=0.00063, scrape_fall_s=.0022):
    """Needle, presser foot, hook and take-up knock and scrape each stitch, uneven in force, timing and pitch."""
    t, out, contact = T[:SR // 40], np.zeros((2, N)), np.zeros(N)
    for share, db, hz, width_hz, side_db, scrape_db in STITCH_BLOWS:
        hits = np.flatnonzero(strikes(turns, share))
        chances = np.sqrt(3) * rng.uniform(-1, 1, (100, 3))  # rms 1
        for at, (strength, late, pitch) in zip(hits, chances):
            at = max(at + round(late * late_s * SR), 0)
            force, f = amp(uneven_db * strength), hz * np.exp(detune * pitch)
            swing = np.exp(-np.pi * width_hz * t) * (1 - np.exp(-f * t * np.pi)) * np.sin(2 * np.pi * f * t)
            ring = np.gradient(swing) * SR / (2 * np.pi * f)
            add(out, at / SR, force * amp(db) * pan(side_db) * ring)
            contact[at] += force * amp(scrape_db)
    contact = signal.oaconvolve(contact, envelope(t, scrape_rise_s, scrape_hold_s, scrape_fall_s))[:N]
    return (out + contact * noise(SCRAPE_SPECTRUM, BODY_SIDE)) * vigour()


def scene():
    """The running machine, its stopping cycle and the hall around it."""
    turns = shaft_angle()
    stitches = needle(turns)
    bangs = knocks() + latch()
    puffs = valves() + cylinders() + bleed()
    wet = hall(amp(-10.5) * stitches + amp(-9.5) * bangs + amp(-9.0) * puffs)
    background = hall_floor() + wet + aftersound()
    stopping = shudder() + servo() + nudges() + puffs + bangs
    running = air_jets() + linkages(turns) + drive(turns) + stitches
    return background + stopping + running


def record(dry):
    """Low-passes the sum at the band edge."""
    lowpass = signal.firwin(511, EDGE_HZ, window=("kaiser", 9), fs=SR)
    return signal.oaconvolve(dry, lowpass[None], "same")


dry = scene()
out = record(dry)
waveform_to_disk(out)
```